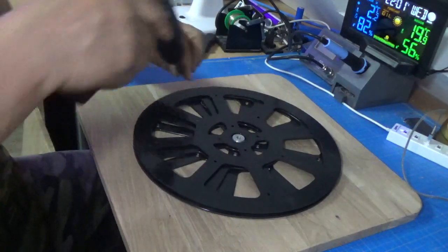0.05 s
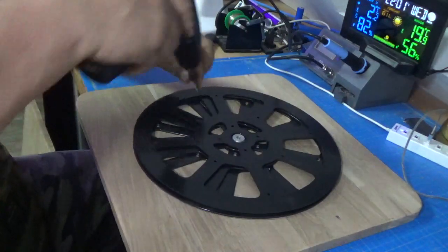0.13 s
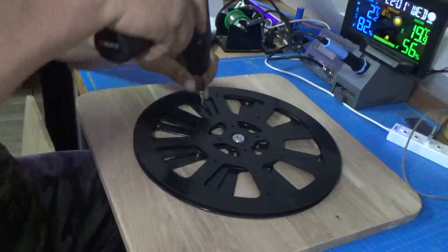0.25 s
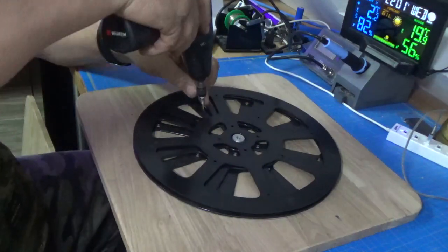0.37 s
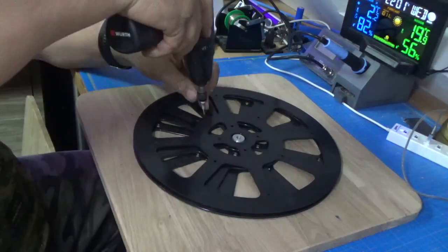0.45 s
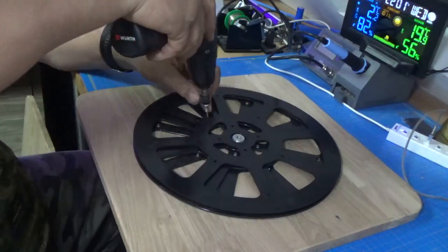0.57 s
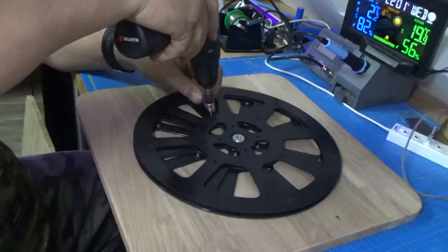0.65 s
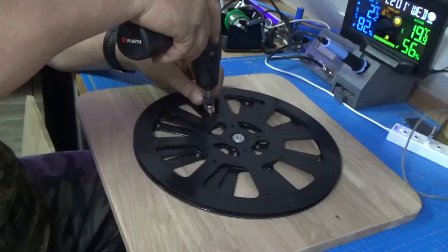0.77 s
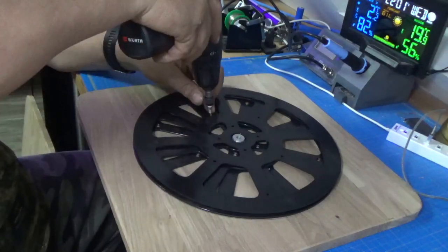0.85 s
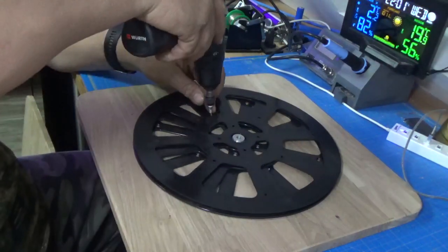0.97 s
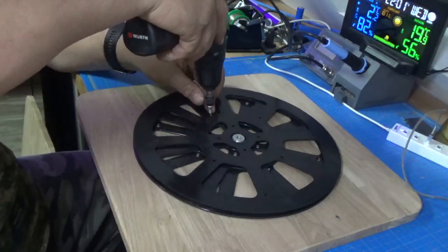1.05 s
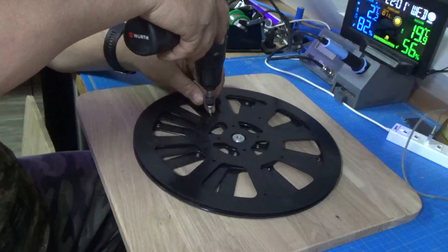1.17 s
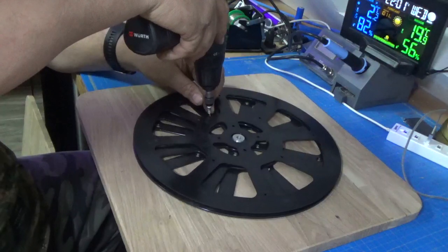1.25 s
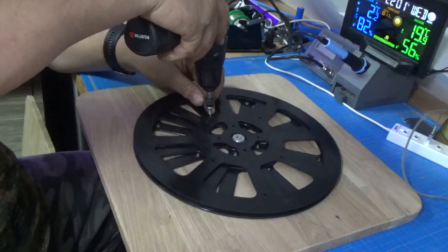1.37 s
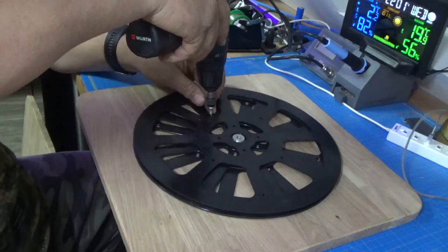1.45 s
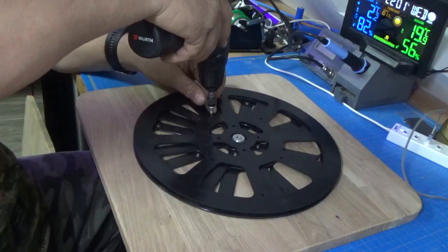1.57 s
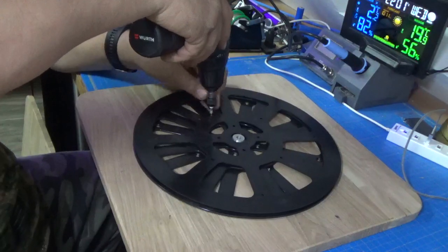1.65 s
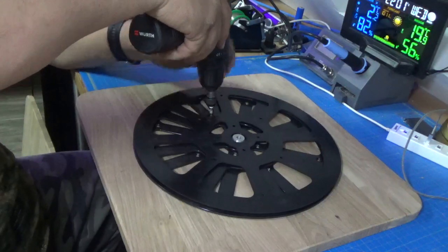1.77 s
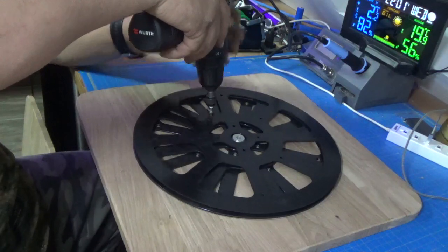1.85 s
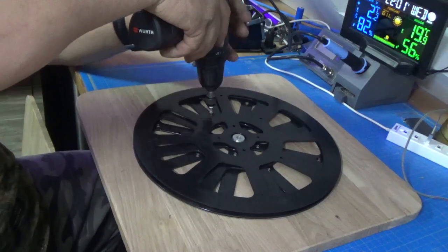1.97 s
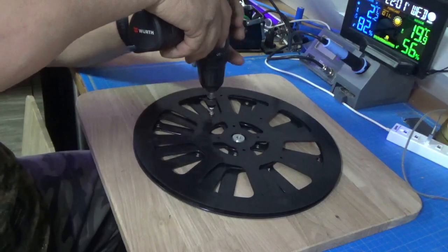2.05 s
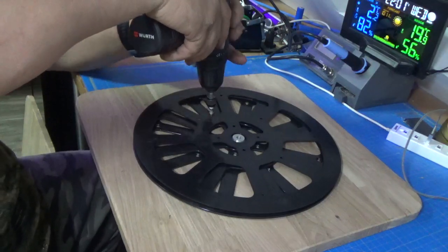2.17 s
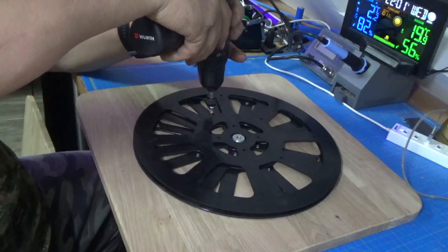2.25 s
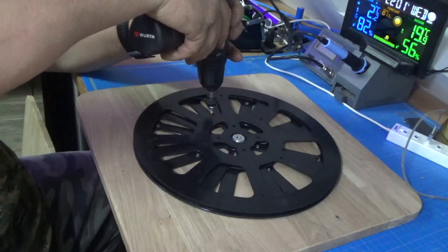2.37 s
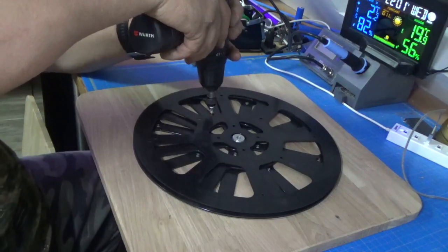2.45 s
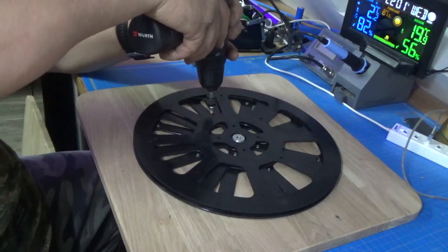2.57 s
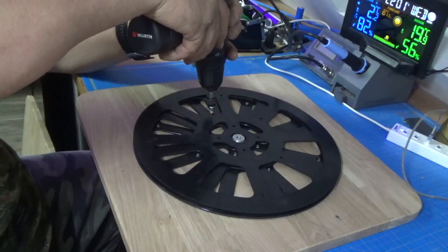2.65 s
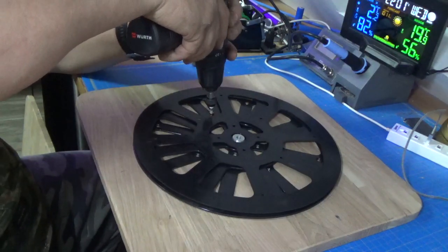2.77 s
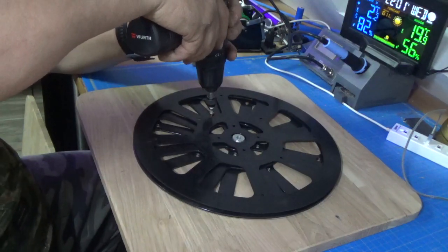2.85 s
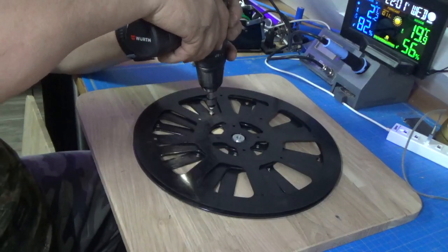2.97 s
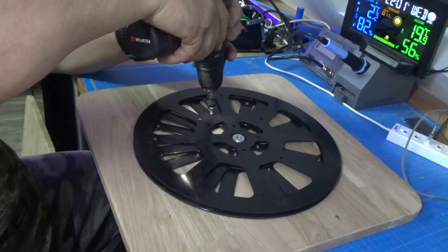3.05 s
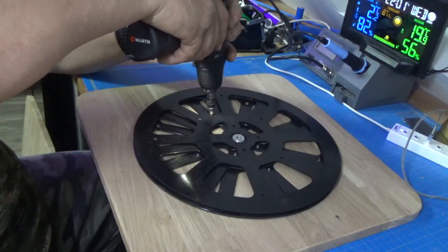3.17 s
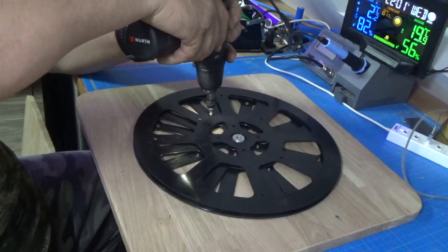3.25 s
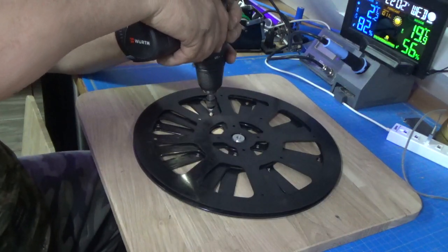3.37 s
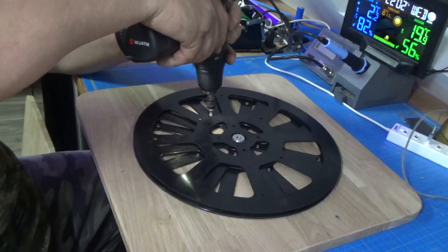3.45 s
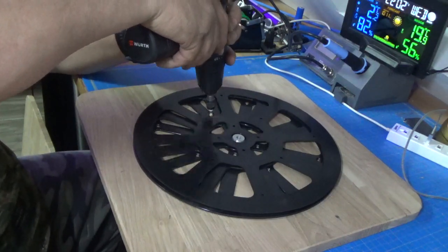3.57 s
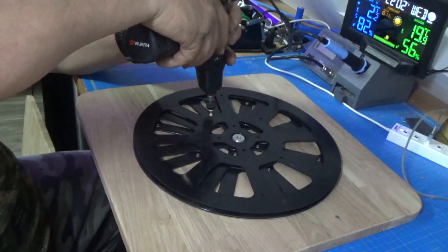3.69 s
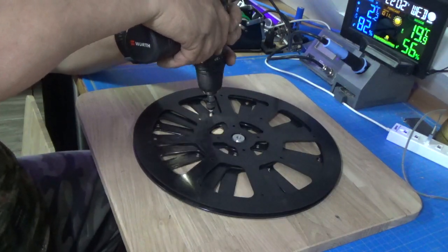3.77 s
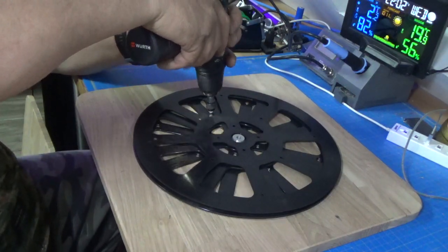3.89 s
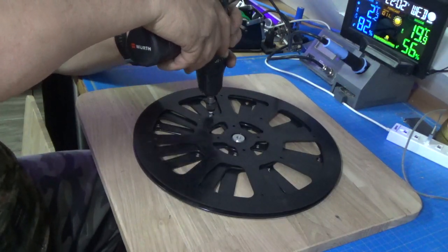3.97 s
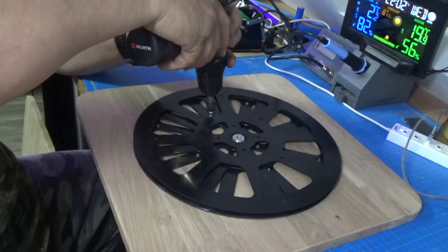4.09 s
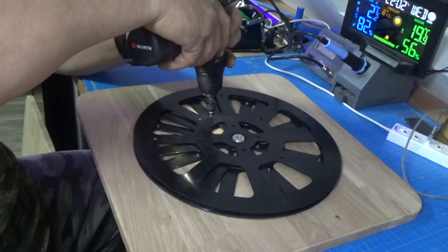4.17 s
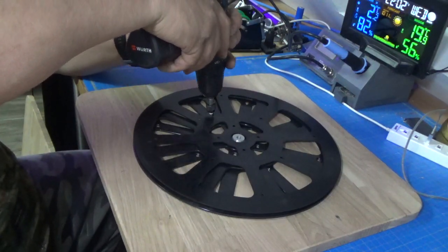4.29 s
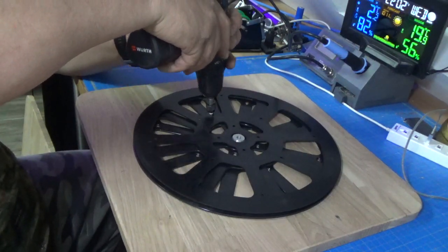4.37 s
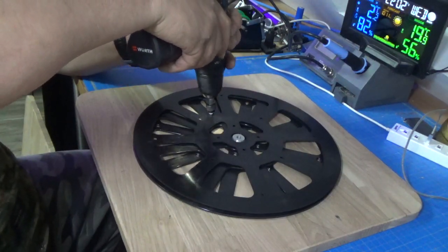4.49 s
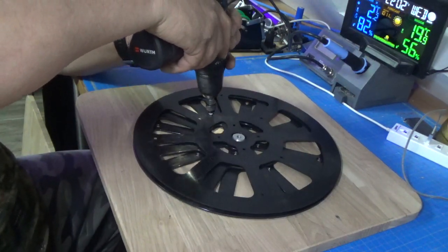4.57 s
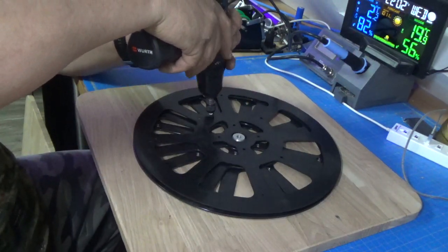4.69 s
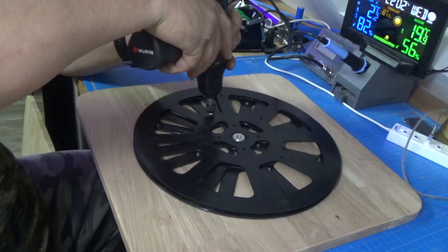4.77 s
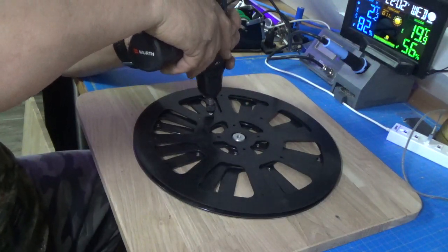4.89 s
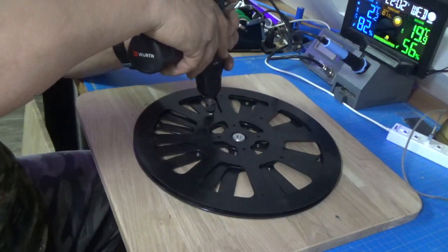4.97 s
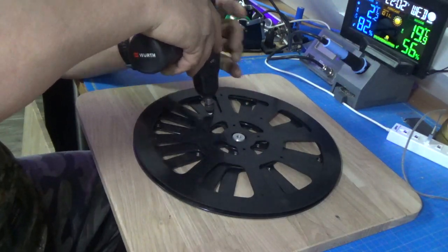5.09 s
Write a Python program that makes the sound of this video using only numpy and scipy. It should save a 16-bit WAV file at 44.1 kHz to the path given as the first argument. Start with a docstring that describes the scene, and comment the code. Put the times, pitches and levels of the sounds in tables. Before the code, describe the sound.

After faint clicks, scrapes and soft bench thumps, a cordless screwdriver whirs in four short bursts, driving a screw, close up in a small workshop.

```python
"""Faint background noise and light handling first: clicks, scrapes and dull thumps as hands set a bit on a screw.
Then four short trigger pulls of a cordless screwdriver, close by in a small workshop; a thin squeak near the end.
Clicks are filtered noise bursts, rubs swelling gritty noise, thumps damped low modes, some under the pulls.
The driver is throbbing gear noise, sine partials that follow the mesh rate, and a low growl of the board."""
import sys
import numpy as np
from scipy import signal
from scipy.fft import rfft, irfft, next_fast_len
from scipy.io import wavfile
from scipy.ndimage import map_coordinates

SR = 44100
rng = np.random.default_rng(int(sys.argv[2]) if len(sys.argv) > 2 else 0)


def to_linear_factor(level_db):
    """Convert decibel levels (scalar or array-like) to linear amplitude factors."""
    exponent = np.asarray(level_db, float) / 20
    return 10 ** exponent


def to_wav(sig):
    """Store sig (one row per channel, or 1-D mono) as 16-bit WAV at the path in sys.argv[1].

    Samples outside -1..1 are clipped; the rate is SR.
    """
    pcm = np.clip(np.atleast_2d(sig), -1, 1) * 32767
    pcm = np.round(pcm).astype(np.int16)
    wavfile.write(sys.argv[1], SR, pcm.T)  # frames by channels


N = 226277

# background noise spectrum: (frequency [Hz], relative density [dB])
AIR_SPECTRUM = [(15, -37), (25, -37), (49, 7.5), (135, -1), (194, -2), (331, -8.5), (428, -6), (695, -11.5),
                (1190, -13), (1980, -16.5), (2200, -14.5), (5110, -22.5), (10500, -24.5), (11300, -36),
                (14700, -48), (22000, -120)]
# faint noise humps in the background, with a narrow hiss band near 10.9 kHz:
# (frequency [Hz], width [Hz], height [dB])
BACKGROUND_HUMPS = [(1150, 300, 4), (3400, 500, 4), (10900, 250, 12)]
# decay of the workshop: (frequency [Hz], t60 [s])
ROOM_DECAY = [(150, 0.58), (1000, 0.27), (4000, 0.27), (10000, 0.25)]
# dull low thumps of the bench, and a few low bumps in the bass under the first pull: (time [s], relative level
# [dB], knock against bench [dB])
THUMPS = [(0.595, -31.5, -21), (0.792, -34.5, -10), (1.047, -62.5, 6), (1.46, -34.5, -11),
          (2.07, -39.5, -12.5), (2.1, -42.5, -13), (2.21, -46, 0), (2.268, -49.5, -2), (2.903, -50, -1.5),
          (3.235, -44, 3), (3.3, -48, 9), (3.4, -49, 10), (4.304, -35.5, -8), (4.677, -44.5, 13),
          (4.952, -51, -19)]
# low bench modes: (frequency [Hz], relative level [dB], t60 [s])
BENCH_MODES = [(51.7, -3, 0.37), (66.8, 9.5, 0.13), (75.6, 1, 0.51), (82.3, -1, 0.36), (99.4, -1, .25)]
# higher modes of sharper thumps: (frequency [Hz], relative level [dB], t60 [s])
KNOCK_MODES = [(161, 6.5, 0.082), (231, 2, 0.21), (278, 6, 0.1)]
# fingers and cloth rub: (time of peak [s], rise [s], fall [s], scrape level [dB], scuff level [dB]);
# over one rise or fall the scrape changes by 20 dB, the scuff by 15 dB
RUBS = [(.06, .1, .16, -58, -53), (.24, .1, .1, -60, -61), (.63, .05, .25, -59, -58),
        (.778, .035, .035, -45, -55), (1.254, .015, .03, -49, -56), (1.46, .01, .058, -42, -50),
        (1.558, .03, .025, -58, -70), (1.762, .01, .04, -52, -62), (1.824, .045, .042, -35.5, -42),
        (1.981, .02, .2, -52, -68), (2.035, .2, .025, -57, -70), (2.216, .015, .1, -60, -53),
        (3.06, .085, .1, -39, -46), (4.87, .2, .3, -64, -68), (5.048, .08, .05, -46, -62),
        (5.128, .025, .05, -45, -58)]
# bright scrape spectrum: (frequency [Hz], relative density [dB])
SCRAPE_SPECTRUM = [(2000, -16), (3000, 2.5), (6000, 2.5), (10000, -4.5), (11200, -1)]
# dull scuff spectrum: (frequency [Hz], relative density [dB])
SCUFF_SPECTRUM = [(350, -8), (700, 1), (1200, -1.5), (1900, -4), (2800, -14.5)]
# squeak track: (time [s], frequency [Hz], relative level [dB])
SQUEAK_TRACK = [(4.86, 5331, -78), (4.874, 5290, -56), (4.894, 5230, -59), (4.91, 5100, -53)]
# dry ticks of bit, screw and trigger: (time [s], relative level [dB], pitch [Hz])
TICKS = [(0.543, -34, 3490), (0.5931, -34.5, 6400), (0.7292, -35, 2420), (0.7582, -29, 8150),
         (0.781, -36.5, 4230), (1.008, -44, 6200), (1.247, -36.5, 3500), (1.462, -24.5, 8920),
         (1.4927, -28, 6560), (1.5483, -34.5, 3950), (1.6673, -34, 3340), (1.701, -40, 4720),
         (1.729, -33.5, 4710), (1.7534, -29.5, 6760), (1.7743, -29, 8630), (1.8091, -23, 2750),
         (1.8394, -24.5, 5450), (2.268, -42, 2500), (2.807, -42, 1540), (2.925, -35, 6830),
         (2.9374, -28.5, 5300), (2.9609, -23.5, 5880), (2.9682, -22.5, 3750), (3.0055, -22, 7120),
         (3.0617, -6, 3870), (3.298, -14, 2000), (3.6498, -15, 1920), (3.7504, -18, 5950),
         (3.8092, -13, 3180), (3.8624, -15, 3200), (4.144, -18, 5750), (4.476, -17.5, 5300)]
# contacts that ring on one pitch: (time [s], relative level [dB], pitch [Hz])
PINGS = [(0.0356, -23, 1990), (0.0412, -27, 1940), (2.215, -36, 2690), (3.01, -16, 3240),
         (3.0273, -24, 3220), (3.047, -24.5, 3260), (3.065, -17, 3370), (4.2111, -4, 3180),
         (4.9509, -45, 4870), (5.1194, -39, 4930)]
# hollow knocks of the tool body: (time [s], relative level [dB], pitch [Hz])
BODY_KNOCKS = [(0.5931, -30, 1200), (0.783, -20, 1320), (1.456, -28, 1500), (1.777, -16, 750),
               (1.8091, -12, 1050), (1.818, -11, 900), (2.068, -30, 1400), (2.1024, -22, 1000),
               (2.903, -20, 1200), (3.6498, -8, 1000), (3.7824, -16, 1200), (3.8092, 2, 1200),
               (3.8624, -2, 1200), (4.2111, -8, 1200)]
# trigger pulls: (press [s], rise constant [s], let go [s], fall constant [s],
# relative rattle level [dB], swell as the screw seats [dB])
PULLS = [(3.08, .055, 3.625, .06, -26.2, 1.5), (3.788, .012, 3.975, .075, -17.8, 0),
         (4.182, .013, 4.347, .052, -17.3, 0), (4.522, .011, 4.642, .058, -17.2, 0)]
# speed arch of each pull: (time of top speed [s], top gear mesh [Hz], up from rest [s], down to rest [s])
SPEED_ARCHES = [(3.31, 1066, .25, 1.25), (3.928, 3125, .125, .115), (4.297, 2645, .085, .075),
                (4.605, 3045, .09, .086)]
# whine partials: (multiple of the mesh, then level against the rattle in pulls 1, 2, 3, 4 [dB])
WHINE_PARTIALS = [(.26, -22, -28, -28, -28), (.873, -15, -13, -18, -18), (1, -14, -11, -10, -6),
                  (1.168, -13, -20, -14, -15), (1.46, -22, -3, -20, -13), (2, -13, -6, -3, -4),
                  (2.72, -20, -14, -22, -20), (3.06, -10, -24, -24, -24), (3.2, -20, -14, -26, -26),
                  (3.52, -22, -28, -24, -16), (3.8, -24, -30, -13, -28), (3.915, -10, -30, -18, -30),
                  (4.92, -10, -40, -40, -40)]
# gear rattle spectrum: (frequency [Hz], relative density [dB])
RATTLE_SPECTRUM = [(710, -28), (1200, -12), (2530, -3.5), (3200, -2), (3790, -3), (5160, -3.5), (6510, -6),
                   (10200, -9.5), (11200, -16), (14600, -60), (22000, -120)]
# tool housing resonances: (frequency [Hz], width [Hz], height [dB])
HOUSING = [(1190, 50, 8), (2050, 90, 4), (2750, 80, 4), (3270, 240, 7), (5280, 160, 5), (5900, 70, 5),
           (6900, 200, 4), (7800, 80, 4), (8410, 90, 7), (9880, 140, 5)]
# growl spectrum: (frequency [Hz], relative density [dB])
GROWL_SPECTRUM = [(35, -36), (65, -11), (160, -13.5), (272, -10.5), (368, -18.5), (587, -15.5),
                  (702, -10.5), (1600, -9.5), (2080, -10), (3520, -120)]
# board resonances: (frequency [Hz], width [Hz], height [dB])
BOARD = [(250, 110, 3), (430, 50, 5), (665, 35, 9), (890, 30, 8), (1190, 45, 8)]

TOP_HZ = 11120  # band limit
AIR_DB = -58
TICK_T60_S, PING_T60_S, KNOCK_T60_S = .027, .021, .032
TICK_FOCUS_DB, PING_FOCUS_DB, TICK_BODY_DB = 6, 17, -6  # gains of pitch and tool body beside the crack
TEETH = 11
RISE_DB, FALL_DB, FADE_DB_PER_S = 30, 38, 35  # depth of rise and fall, fade after let go
SEAT_LEAD_S, SEAT_WIDTH_S, SEAT_GROWL = .05, .09, 2.2  # swell: lead on let go, width, extra share in growl
MIN_SPEED_SHARE = .1
GROWL_DB, LABOUR_DB = -12.5, 6.5  # against the rattle at top speed; rise towards rest
COAST_DB, COAST_S, LINGER_DB = 8.5, .03, 6  # growl hump after let go, its time, lasting rise


def unit(x):
    """Scaled to rms 1."""
    return x / np.sqrt(np.mean(x ** 2) + 1e-20)


def along(points, hz):
    """(frequency [Hz], value) points interpolated on a log axis."""
    f, v = np.transpose(points)
    return np.interp(np.log(hz + 1), np.log(f + 1), v)


def wobble(knots_per_s):
    """A smooth random curve through normally distributed knots."""
    knots = rng.standard_normal(int(N * knots_per_s / SR) + 4)
    return map_coordinates(knots, [np.arange(N) * knots_per_s / SR])


def filtered(x, response):
    """x times a response of frequency."""
    m = next_fast_len(N + SR // 2)
    return irfft(rfft(x, m) * response(np.fft.rfftfreq(m, 1 / SR)), m)[..., :N]


def coloured(x, spectrum, peaks=()):
    """x through a spectrum with resonant humps, rms 1."""
    def response(f):
        humps_db = sum(db / (1 + (2 * (f - hz) / width_hz) ** 2) for hz, width_hz, db in peaks)
        return to_linear_factor(along(spectrum, f) + humps_db)
    return unit(filtered(x, response))


def gritty(grit_db, knots_per_s):
    """Noise whose size jumps quickly, as many tiny impacts do."""
    return rng.standard_normal(N) * to_linear_factor(grit_db * wobble(knots_per_s))


def ring(t, hz, t60_s, attack_s):
    """One damped mode."""
    return np.sin(2 * np.pi * hz * t) * to_linear_factor(-60 * t / t60_s) * (1 - np.exp(-t / attack_s))


def air():
    """Background noise: nearly alike in both channels in the bass, looser above."""
    mid = coloured(gritty(1, 4.5), AIR_SPECTRUM, BACKGROUND_HUMPS)
    side = coloured(rng.standard_normal(N), AIR_SPECTRUM, BACKGROUND_HUMPS)
    side = filtered(side, lambda f: to_linear_factor(along([(60, -26), (600, -2.5), (8000, -6)], f)))
    return to_linear_factor(AIR_DB) * np.array([mid + side, mid - side])


def room(x):
    """The workshop's answer: stereo noise in which each frequency dies at its own speed."""
    hz, t, z = signal.stft(rng.standard_normal((2, SR // 2)), SR, nperseg=256)
    decay = to_linear_factor(-60 * t / along(ROOM_DECAY, hz)[:, None])
    tail = signal.istft(z * decay, SR, nperseg=256)[1]
    tail = 0.15 * tail[0] + tail * [[.4], [.8]]  # the channels share a little
    tail = tail / np.linalg.norm(tail, axis=1)[:, None]
    delayed = np.pad(x, (300, 0))  # samples
    return signal.fftconvolve(delayed[None], tail, axes=1)[:, :N]


def thumps():
    """The bench sounds in close low modes that beat; sharper thumps add more of the higher knock modes."""
    out, t = np.zeros(N + SR), np.arange(SR // 2) / SR
    bench = sum(to_linear_factor(db) * ring(t, hz, t60_s, attack_s=0.014) for hz, db, t60_s in BENCH_MODES)
    knock = sum(to_linear_factor(db) * ring(t, hz, t60_s, attack_s=.002) for hz, db, t60_s in KNOCK_MODES)
    for s, db, sharp_db in THUMPS:
        start = round((s + .003) * SR)
        out[start:][:len(t)] += to_linear_factor(db - 2.5) * (bench + to_linear_factor(sharp_db) * knock)
    return out[:N]


def rubs():
    """Skin and plastic slide in tiny slips: a bright scrape over a duller scuff that swells and dies more slowly."""
    t = np.arange(N) / SR

    def strokes(level_col, slope_db):
        total = np.zeros(N)
        for row in RUBS:
            peak_s, rise_s, fall_s = row[:3]
            distance = np.maximum((peak_s - t) / rise_s, (t - peak_s) / fall_s)
            total += to_linear_factor(row[level_col] - slope_db * distance)
        return total

    scrape = coloured(gritty(2, 300), SCRAPE_SPECTRUM)
    scuff = coloured(gritty(2.5, 150), SCUFF_SPECTRUM, HOUSING[:2])
    return strokes(3, slope_db=20) * scrape + strokes(4, slope_db=15) * scuff


def squeak():
    """One thin falling squeak: a gliding sine."""
    s, hz, db = np.transpose(SQUEAK_TRACK)
    t = np.arange(N) / SR
    edge = np.clip(np.minimum(t - s[0], s[-1] - t) / 0.0069, 0, 1)  # ramps in s
    phase = 2 * np.pi * np.cumsum(np.interp(t, s, hz)) / SR
    return edge * to_linear_factor(np.interp(t, s, db) + 4) * np.sin(phase)


def clicks():
    """Contacts as short bursts: a dry crack, more or less focused on a pitch, or a knock of the tool body."""
    out, t = np.zeros(N + SR), np.arange(4096) / SR
    f = np.fft.rfftfreq(len(t), 1 / SR)

    def band(hz, q):
        return 1j * f * hz / q / (hz * hz - f * f + 1j * f * hz / q)

    crack = band(3700, 0.67) / (1 + 1j * f / 9000)
    tick_base = crack + to_linear_factor(TICK_BODY_DB) * band(1205, 6.9)
    contacts = [(s, db - 3.5, TICK_T60_S, tick_base + to_linear_factor(TICK_FOCUS_DB) * band(hz, 8.8)) for s, db, hz in TICKS]
    contacts += [(s, db - 9, PING_T60_S, crack + to_linear_factor(PING_FOCUS_DB) * band(hz, 8.8)) for s, db, hz in PINGS]
    contacts += [(s, db, KNOCK_T60_S, band(hz, 5.5)) for s, db, hz in BODY_KNOCKS]
    for s, db, t60_s, colour in contacts:
        envelope = to_linear_factor(-60 * t / t60_s) * (1 - np.exp(-t / .0016))
        burst = rng.standard_normal(len(t)) * envelope
        out[round(s * SR):][:len(t)] += to_linear_factor(db) * irfft(rfft(burst) * colour, len(t))
    return out[:N]


def trigger():
    """Pull index, level [dB], speed as a share of the top, time since let go [s], seating swell [dB]."""
    t = np.arange(N) / SR
    starts_s = [row[0] - .03 for row in PULLS]
    pull = np.clip(np.searchsorted(starts_s, t) - 1, 0, None)
    press, rise, off, fall, db, seat_db = np.array(PULLS)[pull].T
    after_s = np.clip(t - off, 0, None)
    swell_db = seat_db * np.exp(-((t - off + SEAT_LEAD_S) / SEAT_WIDTH_S) ** 2)
    rise_db = -RISE_DB * np.exp(np.clip((press - t) / rise, None, .15))
    fall_db = -FALL_DB * (1 - np.exp(-after_s / fall)) - FADE_DB_PER_S * after_s
    mute_db = -60 * (t < PULLS[0][0] - rise)  # ahead of the first pull
    level_db = db + rise_db + swell_db + fall_db + mute_db
    peak, _, up, down = np.array(SPEED_ARCHES)[pull].T
    arch = 1 - ((t - peak) / np.where(t < peak, up, down)) ** 2
    return pull, level_db, np.clip(arch, MIN_SPEED_SHARE, 1), after_s, swell_db


def driver():
    """Gear teeth rattle the housing, throbbing with the shaft; mesh partials whine; the screw shakes the board."""
    pull, level_db, share, after_s, swell_db = trigger()
    driven = np.exp(-after_s / COAST_S)
    mesh_hz = share * np.array(SPEED_ARCHES)[pull, 1] * (1 + .0015 * wobble(40))
    cycles = np.cumsum(mesh_hz) / SR
    shaft_phase = 2 * np.pi * cycles / TEETH
    throb = to_linear_factor(0.62 * np.sin(shaft_phase) + 0.4 * np.sin(shaft_phase / 7.0))
    rattle = coloured(gritty(1.8, 900) * throb * to_linear_factor(1.5 * wobble(90)), RATTLE_SPECTRUM, HOUSING)

    rough = .7 + mesh_hz / 2500  # the faster, the more broken the whine
    whine = np.zeros(N)
    for order, *pull_dbs in WHINE_PARTIALS:
        size = to_linear_factor(np.array(pull_dbs)[pull] + rough * wobble(35))
        tone = np.sin(2 * np.pi * order * cycles + .2 * rough * wobble(200))
        whine += size * tone * (order * mesh_hz < TOP_HZ)
    # stands out only near the top speed of each pull
    whine = whine * share ** 4 * driven * to_linear_factor(swell_db)

    growl = coloured(gritty(2.5, 150), GROWL_SPECTRUM, BOARD)
    coast_db = COAST_DB * np.e * after_s / COAST_S
    growl_db = GROWL_DB + SEAT_GROWL * swell_db
    growl_db = growl_db + driven * (LABOUR_DB * (1 - share) + coast_db) + LINGER_DB * (1 - driven)
    return to_linear_factor(level_db) * (rattle + whine + to_linear_factor(growl_db) * growl)


def scene():
    """Near sounds, slightly to the right, with their room; its bass is thinned, as the bench has its own modes."""
    near = driver() + clicks() + rubs() + squeak()
    direct = near * to_linear_factor([[-1.2], [-.8]])
    reverb = to_linear_factor(-8) * room(filtered(near, lambda hz: hz / (hz + 150)))
    return direct + reverb + thumps() + air()


def band_limit(x):
    """A steep low-pass at the top of the band."""
    return signal.sosfilt(signal.butter(12, 12340, fs=SR, output="sos"), x)


def record(dry):
    """The camera rounds off the tallest peaks and cuts steeply above its band limit."""
    soft = dry / (1 + np.abs(dry / .62) ** 4) ** (1 / 4)
    limited = filtered(soft, lambda hz: 1 / (1 + (hz / TOP_HZ) ** 130))
    return band_limit(limited)


dry = scene()
out = record(dry)
to_wav(out)
```